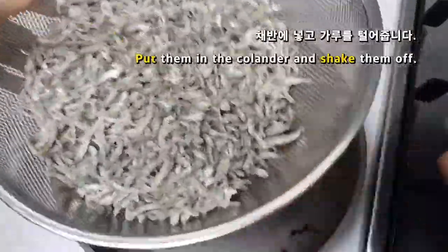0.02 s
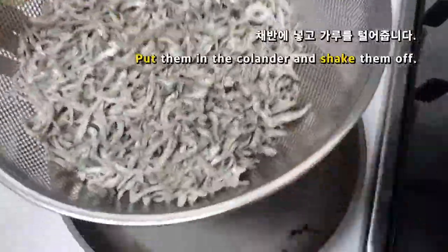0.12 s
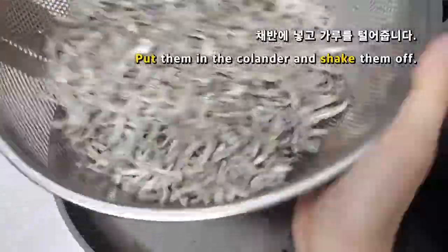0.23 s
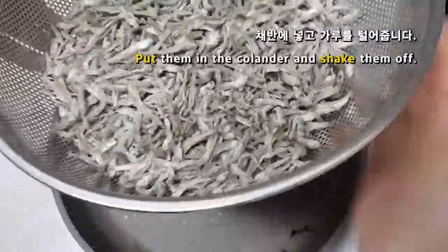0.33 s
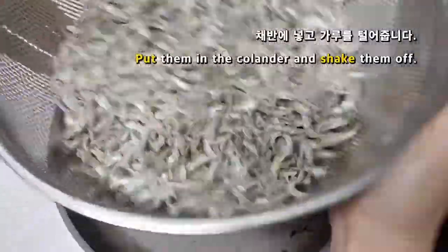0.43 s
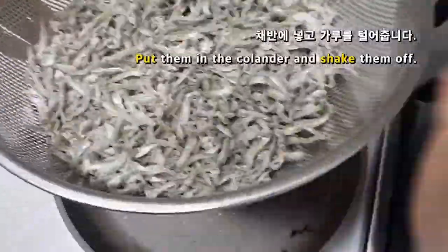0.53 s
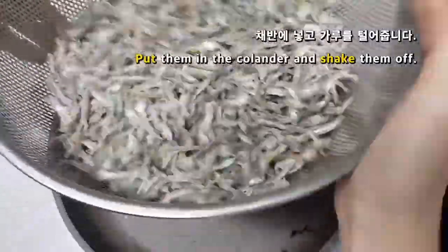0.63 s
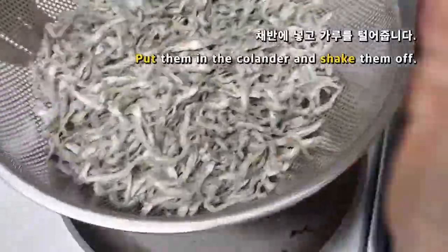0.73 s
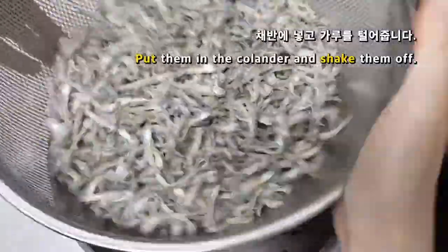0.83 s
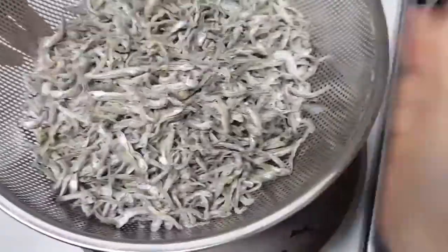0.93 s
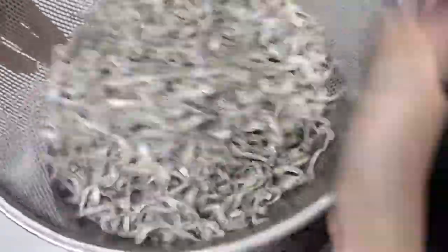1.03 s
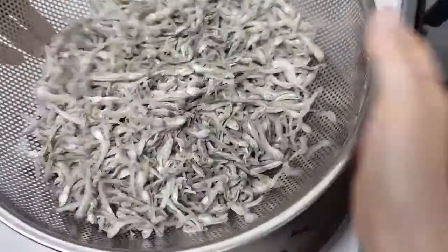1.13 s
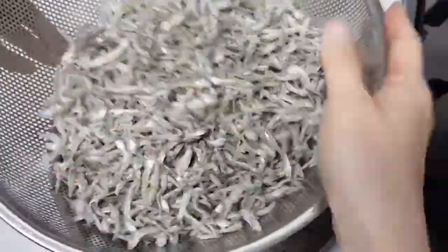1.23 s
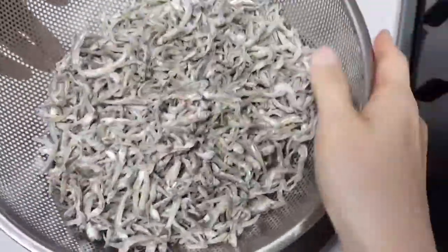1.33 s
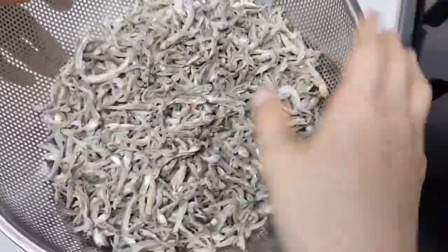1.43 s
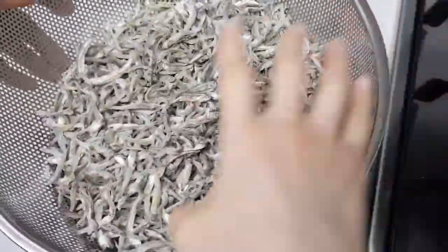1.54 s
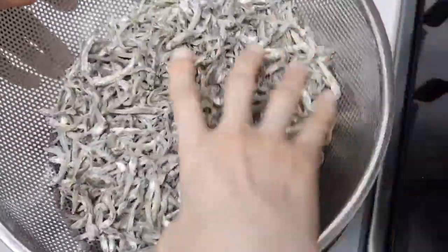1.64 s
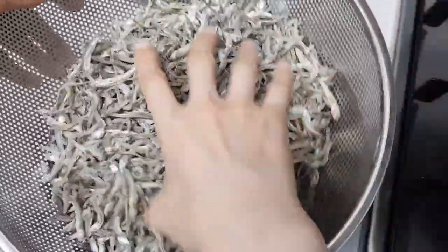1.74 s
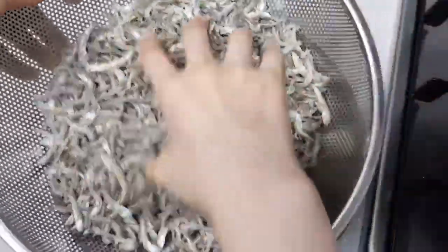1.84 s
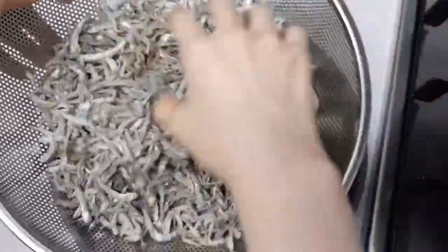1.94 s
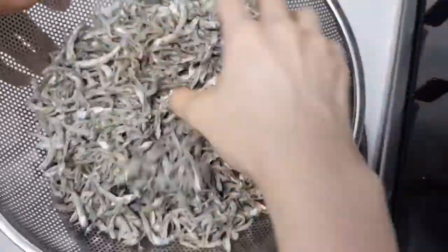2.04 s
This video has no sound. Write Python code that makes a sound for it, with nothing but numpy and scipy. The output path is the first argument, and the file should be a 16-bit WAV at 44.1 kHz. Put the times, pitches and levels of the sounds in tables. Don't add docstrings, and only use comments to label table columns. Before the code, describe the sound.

Dry snapping clatter of tiny dried fish tossed in a metal strainer, then a soft finger rake

```python
import sys
import numpy as np
from scipy import signal
from scipy.fft import rfft, irfft
from scipy.io import wavfile
from scipy.ndimage import uniform_filter1d

SR = 44100
rng = np.random.default_rng(int(sys.argv[2]) if len(sys.argv) > 2 else 0)


def generate_wav(signal):
    frames = np.transpose(np.atleast_2d(signal))
    scaled = np.clip(frames, -1, 1) * 32767
    pcm = np.round(scaled).astype(np.int16)
    wavfile.write(sys.argv[1], SR, pcm)


def how_loud(loudness_db):
    steps = np.asarray(loudness_db, float) / 20
    return 10 ** steps


N = 92610

# pitch_hz, level_db (per Hz)
RUMBLE_COLOUR = [(25, -11), (70, 3), (115, 0), (155, -11.5), (350, -16), (600, -23.5), (1200, -27),
                 (3000, -41.5)]
# pitch_hz, level_db (per Hz)
HISS_COLOUR = [(600, -2), (1900, -15), (5000, -10.5), (8600, -31), (10500, -7), (13000, -4.5),
               (14800, -3.5), (16500, -2.3)]
# time_s, rumble_db, hiss_db
AIR_SWELL = [(0, -3, 0), (.08, 4.5, -1.5), (.18, -4, 3), (.3, 3, 6), (.8, 2, 6.5), (1.15, -4.5, 9),
             (1.3, 6.5, -7), (1.43, -5, 6.5), (1.55, -0.5, 4.5), (1.78, 0.5, 5.5), (2.1, -3, -0.5)]
# time_s, level_db
WHINE_LEVEL = [
    (0, -70),
    (.06, -87.5),
    (.18, -76),
    (.45, -71),
    (1.0, -71),
    (1.3, -70),
    (2.1, -71),
]
# start_s, level_db, rise_s, fall_t60_s
LANDINGS = [(0.077, -70, 0.0024, 0.052), (0.189, -64.5, 0.0062, 0.097), (0.209, -30, 0.0048, 0.06),
            (.217, -27, 0.0022, 0.12), (0.233, -30, 0.0016, 0.052), (0.385, -55, 0.0074, 0.029),
            (0.4106, -50, 0.002, 0.057), (0.4158, -21.5, 0.0013, 0.023), (0.4198, -22.5, 0.00039, 0.089),
            (0.438, -28, 0.0039, 0.022), (0.482, -38.5, 0.018, 0.035), (.610, -49, .003, 0.1),
            (0.629, -26.5, 0.01, 0.13), (0.686, -31, 0.0016, 0.11), (.831, -40, 0.0011, 0.046),
            (0.833, -31.5, 0.0071, 0.14), (0.868, -34.5, 0.0015, 0.15), (.976, -59, 0.0039, 0.07),
            (1.004, -58, 0.0034, 0.49), (1.041, -35.5, 0.01, 0.25), (1.053, -28, 0.0037, 0.073),
            (1.07, -33.5, 0.015, 0.12), (1.219, -48, 0.0031, 0.11), (1.2247, -43.5, 0.0044, 0.068),
            (1.2385, -39, 0.0018, 0.17), (1.252, -51, .002, 0.14), (1.279, -38, 0.0015, 0.14),
            (1.282, -39, 0.0022, 0.19), (1.301, -46, 0.0017, 0.055), (1.325, -44.5, 0.0068, 0.062),
            (1.411, -56, 0.0038, 0.066), (1.476, -48.5, 0.0054, 0.11), (1.615, -51.5, 0.0011, 0.076),
            (1.792, -56.5, 0.0021, 0.061), (2.001, -58, .003, 0.095)]
# time_s, level_db
RAKING = [
    (1.36, -96),
    (1.55, -94),
    (1.62, -64),
    (1.69, -66),
    (1.74, -62),
    (1.81, -56),
    (1.89, -58.5),
    (1.97, -65),
    (2.1, -77),
]
# pitch_hz, level_db
CRACKLE_COLOUR = [(600, -21.5), (2400, -15.5), (3900, -4), (6900, -3.5), (8800, -7), (10500, -3.5),
                  (13000, -1.5), (16000, -5.5)]
# pitch_hz, level_db, t60_s
MESH_MODES = [(2210, 8, 0.018), (3945, 4, 0.018), (4450, -12, 0.01), (4950, -27, 0.01), (6530, -44, 0.0079),
              (6520, 11, 0.005), (6480, -17, 0.02), (6700, 0.5, 0.028), (11340, 10, 0.012),
              (12100, 11, 0.013)]
# start_s, level_db, pitch_hz, t60_s
PINGS = [(.638, -13, 6520, 0.03), (0.841, -23, 6810, 0.047), (.842, -29, 3945, 0.034), (.99, -71, 1540, .1),
         (1.056, -22.5, 3960, 0.035), (1.239, -48.5, 3930, 0.064), (1.246, -31.5, 6780, 0.16),
         (1.243, -47, 1524, 0.066), (1.26, -48.5, 1470, 0.15), (1.282, -30, 4100, 0.034),
         (1.285, -50, 1562, 0.1), (1.293, -41, 1627, 0.039), (1.328, -48.5, 1524, 0.096),
         (1.384, -70, 1520, 0.042), (1.41, -66, 1500, .08), (1.478, -42.5, 4650, 0.032),
         (1.479, -43.5, 7470, 0.033), (1.483, -49.5, 4380, 0.046), (.078, -63, 3460, .04),
         (1.616, -64, 1550, 0.14), (2.004, -49.5, 4100, 0.026), (.2105, -28, 710, 0.062),
         (.2105, -38, 628, 0.07), (.2185, -15, 12600, 0.032), (.8365, -26, 11000, 0.028),
         (.843, -17, 11460, .025), (.4165, -32.5, 743, .05), (.6455, -22, 12100, 0.036),
         (.4165, -38.5, 1306, .05), (.4165, -40, 994, .05), (.418, -37.5, 353.3, 0.077),
         (.633, -45.5, 253, .07), (.634, -58, 2230, .04), (.245, -44.5, 643, .07), (.665, -45, 604, .06),
         (.633, -35.5, 723, 0.054), (.834, -44.5, 690, 0.053), (1.0465, -38, 712, 0.11),
         (1.059, -50, 1670, 0.036), (1.222, -49.5, 717, .06), (1.33, -50, 6750, .06),
         (1.346, -49, 6700, .06), (1.478, -42, 10500, .025), (1.2265, -46, 3920, .05),
         (.417, -11, 7190, .02), (.42, -15.5, 11640, 0.04), (.442, -25, 3900, 0.026),
         (1.284, -32.5, 10660, .02), (1.86, -62, 4550, .04)]
# start_s, ring_db, thud_db, tilt_db (brightness per octave)
PALM_SLAPS = [
    (0.2108, -37.5, -35.5, 1.5),
    (0.4164, -36.5, -37, 2),
    (.6331, -40.5, -37.5, -1.5),
    (0.8319, -48, -43.5, -2.2),
    (1.0459, -48, -37.5, -3),
    (1.2216, -53.5, -46, -4),
]
# pitch_hz, level_db, t60_s
BOWL_MODES = [(194, -12, 0.076), (256, -8.5, 0.1), (345.7, -6.5, 0.052), (542.4, -9.5, 0.083),
              (641, -11, 0.048), (732, -4.5, 0.05), (986, -5, 0.051), (1180, -7.5, 0.03),
              (1390, -3.5, 0.053), (1655, -3.5, 0.024), (2045, -6.5, .031), (2157, -15, .031),
              (2606, -6, .025)]
# time_s, level_db
SKIN_BRUSH = [
    (1.7, -97),
    (1.755, -68.5),
    (1.8, -65.5),
    (1.825, -72),
    (1.9, -72),
    (1.95, -81.5),
]
# time_s, pitch_hz, level_db
FINGER_DRAG = [
    (1.73, 1170, -102),
    (1.755, 1240, -70),
    (1.772, 1390, -65),
    (1.79, 1210, -66),
    (1.803, 1030, -65),
    (1.82, 960, -74),
    (1.85, 1057, -69),
    (1.895, 1020, -81),
    (1.92, 920, -97),
]
# start_s, end_s, depth_db
TREBLE_DIPS = [
    (0.399, 0.408, -35),
    (0.823, 0.824, -26),
    (1.273, 1.276, -2.5),
    (1.465, 1.474, -7),
]
# pitch_hz, level_db
PORT_SHADE = [(500, -9), (2000, -7), (3600, -13), (7400, -19), (8800, -7), (9900, -1), (12000, -6),
              (16000, -11)]

PORT_LAG = 13


def evened(x):
    return x / np.sqrt(np.mean(x ** 2) + 1e-20)


def curve(points):
    s, db = np.transpose(points)
    return how_loud(np.interp(np.arange(N) / SR, s, db))


def wander(width):
    once = uniform_filter1d(rng.standard_normal(N), int(width))
    return evened(uniform_filter1d(once, int(width)))


def shaped(x, colour):
    hz, db = np.transpose(colour)
    log_f = np.log(np.fft.rfftfreq(N, 1 / SR) + 1)
    gain = how_loud(np.interp(log_f, np.log(hz), db, left=-40))
    return evened(irfft(rfft(x) * gain, N))


def causal(colour):
    hz, db = np.transpose(colour)
    f = np.fft.rfftfreq(2048, 1 / SR)
    cepstrum = irfft(np.log(how_loud(np.interp(np.log(f + 1), np.log(hz), db))))
    cepstrum[1:1024] *= 2
    cepstrum[1025:] = 0
    return irfft(np.exp(rfft(cepstrum)))


def modes(table, detune):
    t = np.arange(12000) / SR
    return sum(how_loud(db - 60 * t / t60) * np.sin(2 * np.pi * hz * d * t)
               for (hz, db, t60), d in zip(table, detune))


def grains(per_s, spread_db):
    size = how_loud(spread_db * np.minimum(rng.exponential(1, N), 5))
    sign = np.sign(rng.standard_normal(N))
    return evened(size * sign * (rng.random(N) < per_s / SR))


def ports(x, y, same):
    same = np.clip(same, -1, 1)
    return np.array([x, same * np.roll(x, PORT_LAG) + np.sqrt(1 - same ** 2) * y])


def kitchen():
    s, rumble_db, hiss_db = np.transpose(AIR_SWELL)
    rumble = shaped(ports(*rng.standard_normal((2, N)), .8), RUMBLE_COLOUR) * how_loud(np.array([[3], [-5]]))
    hiss = shaped(rng.standard_normal((2, N)), HISS_COLOUR) * how_loud(np.array([[1], [-2]]))
    lumps = wander(1500)
    phase = 2 * np.pi * np.cumsum(786 + 0.87 * lumps) / SR
    whine = curve(WHINE_LEVEL) * how_loud(1.5 * wander(680)) * np.sin(phase)
    rumble = how_loud(-62 + 1.5 * lumps) * curve(np.c_[s, rumble_db]) * rumble
    hiss = how_loud(-69) * curve(np.c_[s, hiss_db]) * hiss
    return rumble + hiss + whine * how_loud(np.array([[6], [-11]]))


def fish_power():
    settle_db, settle_t60_s = -13.5, 0.053
    t = np.arange(N) / SR
    power = curve(RAKING) ** 2 * (np.arange(N) > 1.36 * SR)
    for s, db, rise, t60 in LANDINGS:
        u = np.maximum(t - s, 0)
        after = np.maximum(u - rise, 0)
        clump = how_loud(db - 60 * after / t60) ** 2
        stragglers = how_loud(db + settle_db - 60 * after / settle_t60_s) ** 2
        power = power + np.minimum(u / rise, 1) ** 2 * (clump + stragglers)
    return power


def fish():
    power = fish_power()
    weight = power / how_loud(-39) ** 2
    snaps = np.zeros((2, N))
    clatter = wander(60)
    for hz in np.geomspace(500, 17000, num=13):
        cycles = np.arange(int(6 * SR / hz) + 8) * hz / SR
        snap = np.sin(2 * np.pi * cycles) * cycles * np.exp(-cycles / 0.57)
        snap = snap * np.sqrt(hz / 8000) / np.linalg.norm(snap)
        reach = weight ** (.28 * np.clip(np.log2(4000 / hz), 0, 1))
        uneven_db = 2.2 * np.clip(weight ** .12, .4, 1) * (.5 * clatter + .9 * wander(300))
        contacts = ports(grains(hz * .5, 2.4), grains(hz * .5, 2.0), 0.4)
        train = np.sqrt(power) * reach * how_loud(uneven_db) * contacts
        snaps += signal.oaconvolve(train, snap[None], axes=1)[:, :N]
    ring = modes(MESH_MODES, np.ones(len(MESH_MODES)))[:5000]
    taps = np.sqrt(power) * ports(grains(1200, 4.5), grains(1200, 4.5), .5)
    crackle = snaps + how_loud(-29.0) * signal.fftconvolve(taps, ring[None], axes=1)[:, :N]
    crackle = how_loud(-0.5) * signal.fftconvolve(crackle, causal(CRACKLE_COLOUR)[None], axes=1)[:, :N]
    low = signal.oaconvolve(crackle, signal.firwin(255, 3300, fs=SR)[None], "same")
    body = np.minimum(abs(uniform_filter1d(weight, size=200)) ** .045, 1)
    return crackle - low * (1 - body)


def pings():
    out = np.zeros(N + SR)
    for s, db, hz, t60 in PINGS:
        ring = min(t60, 130 / hz ** .95 + .012)
        detune = 1 + np.array([0, .04, -.05]) * rng.uniform(.6, 1.4, 3)
        sound = modes([(hz, db, ring), (hz, db - 4, ring), (hz, db - 6, ring)], detune)
        start = round(s * SR)
        out[start:start + len(sound)] += sound * np.minimum(np.arange(len(sound)) / SR / .002, 1)
    return np.array([out[:N], how_loud(-3.5) * np.roll(out[:N], PORT_LAG)])


def slaps():
    thud_hz, thud_t60_s = 74, .18
    out = np.zeros((2, N))
    t = np.arange(900) / SR
    for s, db, thud_db, tilt_db in PALM_SLAPS:
        push = np.exp(-t / .006) * rng.standard_normal((2, len(t))) * .08
        push[:, 20] += 1
        struck = [(hz, level + tilt_db * np.log2(hz / 700), min(t60, 60 / hz))
                  for hz, level, t60 in BOWL_MODES]
        bowl = modes(struck, rng.uniform(1.0, 1.02, len(BOWL_MODES)))
        sound = signal.fftconvolve(push, bowl[None], axes=1)[:, :12000]
        sound *= np.minimum(np.arange(12000) / SR / .004, 1)
        sound /= np.sqrt(np.mean(sound[:, :1300] ** 2, axis=1, keepdims=True))
        thud = modes([(thud_hz, thud_db, thud_t60_s)], rng.uniform(0.95, 1.07, 1))
        thud = thud * np.array([[1], [-.6]])
        start = round(s * SR)
        out[:, start:start + sound.shape[1]] += how_loud(db) * sound + thud
    return out * how_loud(np.array([[0], [-8.5]]))


def brush():
    band = signal.butter(2, [750, 1700], "band", fs=SR, output="sos")
    skin = signal.sosfilt(band, ports(grains(3500, 2.8), grains(2500, 1.8), 0.6))
    s, hz, db = np.transpose(FINGER_DRAG)
    turn = np.exp(2j * np.pi * np.cumsum(np.interp(np.arange(N) / SR, s, hz)) / SR)
    r = np.exp(-np.pi * 540 / SR)
    catches = ports(grains(2000, 1.4), grains(2500, 2.5), 0.96)
    drag = (turn * signal.lfilter([1], np.poly([r, r]), catches / turn)).real
    both = curve(SKIN_BRUSH) * evened(skin) + curve(np.c_[s, db]) * evened(drag)
    return both * how_loud(np.array([[3], [-4]]))


def room(x, t60):
    t = np.arange(SR // 2) / SR
    tail = rng.standard_normal((2, len(t))) * how_loud(-60 * t / t60) * np.minimum(t / 0.0084, 1)
    return signal.fftconvolve(x, tail / np.linalg.norm(tail[0]), axes=1)[:, :N]


def shade(x):
    return np.array([x[0], signal.fftconvolve(x[1], causal(PORT_SHADE))[:N]])


def scene():
    air, crackle, ping, palm = kitchen(), fish(), pings(), slaps()
    near = crackle + ping + how_loud(-10) * room(crackle + .5 * ping, 0.31)
    palm_room = how_loud(-2.5) * room(palm * wander(115), 0.33)
    return shade(near) + palm + palm_room + brush() + air


def top_cut(x):
    return signal.sosfilt(signal.butter(12, 16810, fs=SR, output="sos"), x)


def record(dry):
    t = np.arange(N) / SR
    dip_db = sum(db * np.clip(np.minimum(t - a, b - t) / 0.0087 + .5, 0, 1) for a, b, db in TREBLE_DIPS)
    low = signal.oaconvolve(dry, signal.firwin(301, 1100, fs=SR)[None], "same")
    edge = signal.firwin(511, 15950, window=("kaiser", 8), fs=SR)
    mix = signal.oaconvolve(low + how_loud(dip_db) * (dry - low), edge[None], "same")
    return top_cut(mix)


dry = scene()
out = record(dry)
generate_wav(out)
```